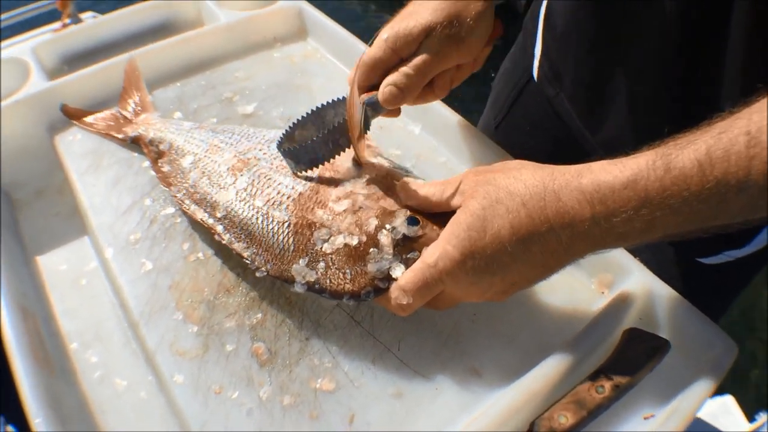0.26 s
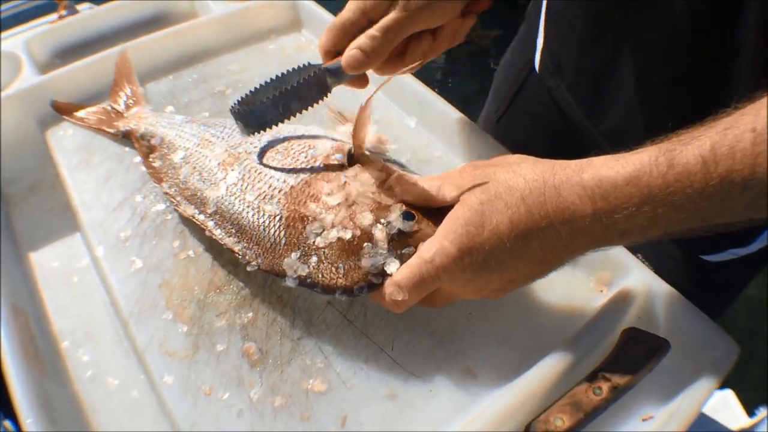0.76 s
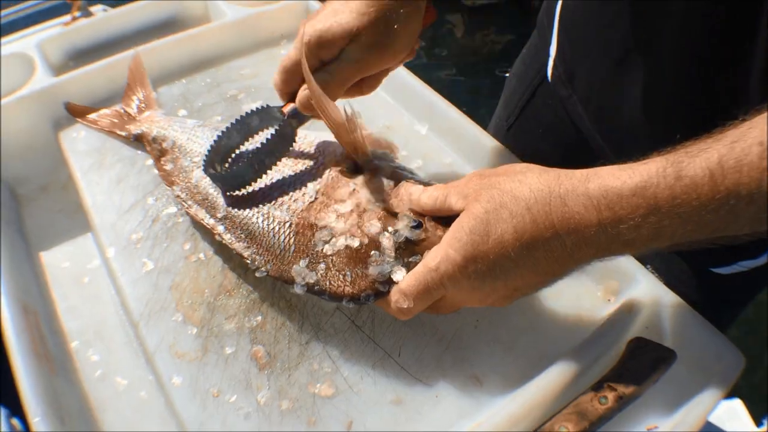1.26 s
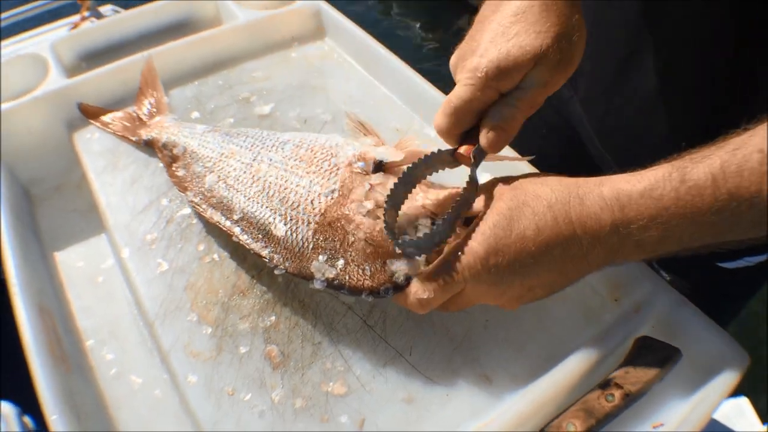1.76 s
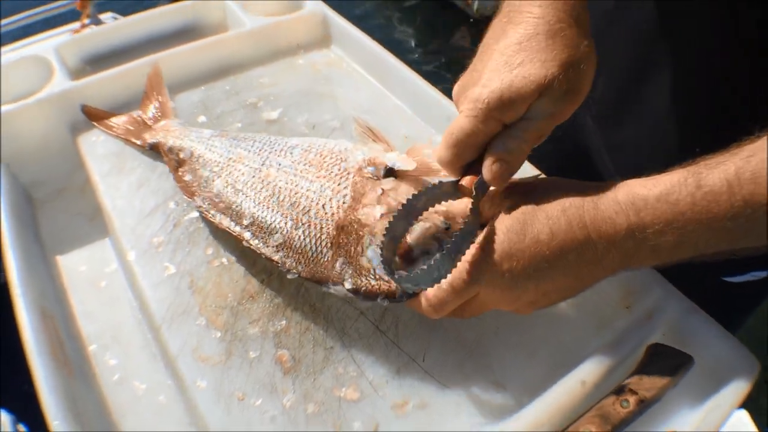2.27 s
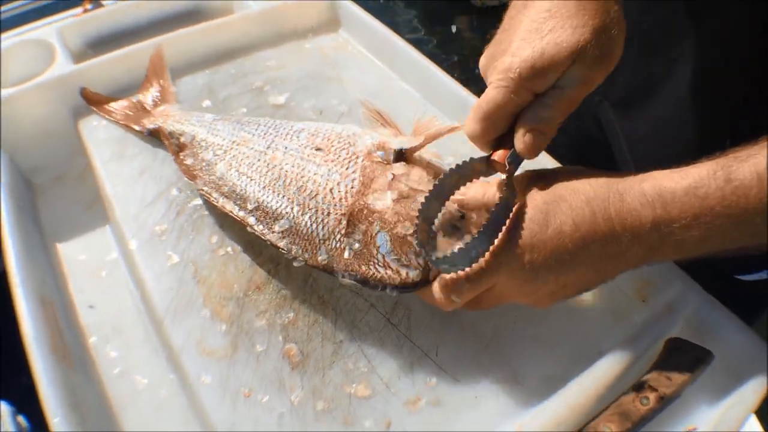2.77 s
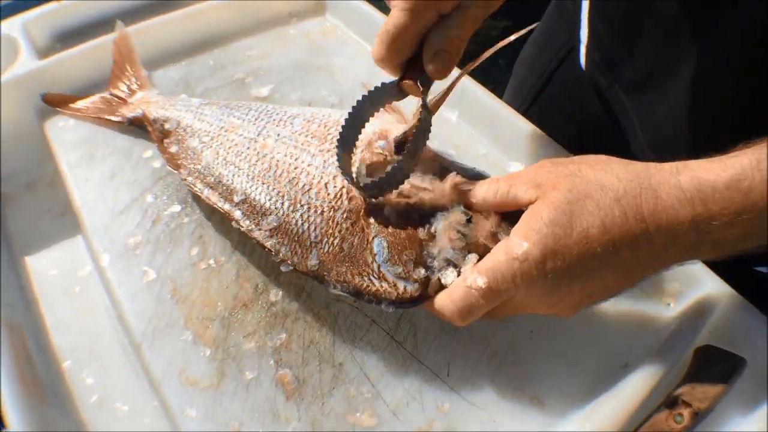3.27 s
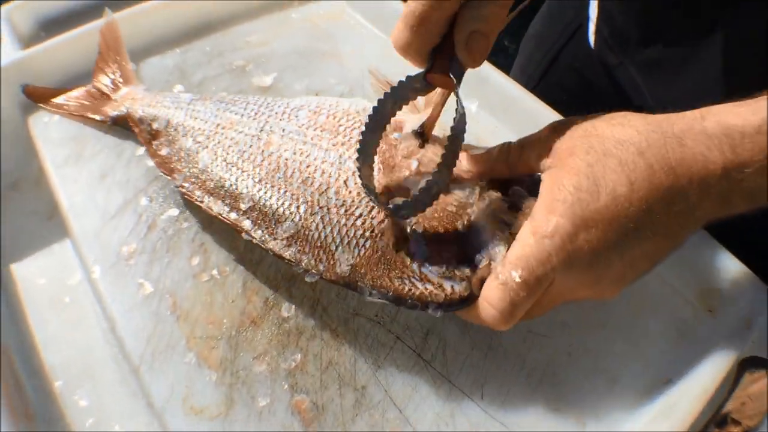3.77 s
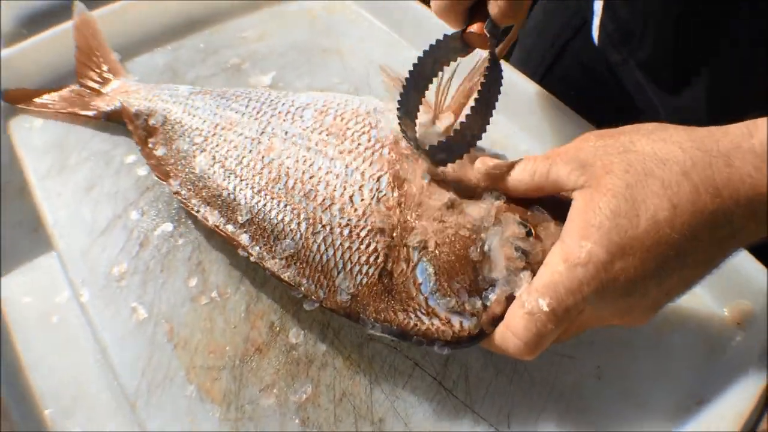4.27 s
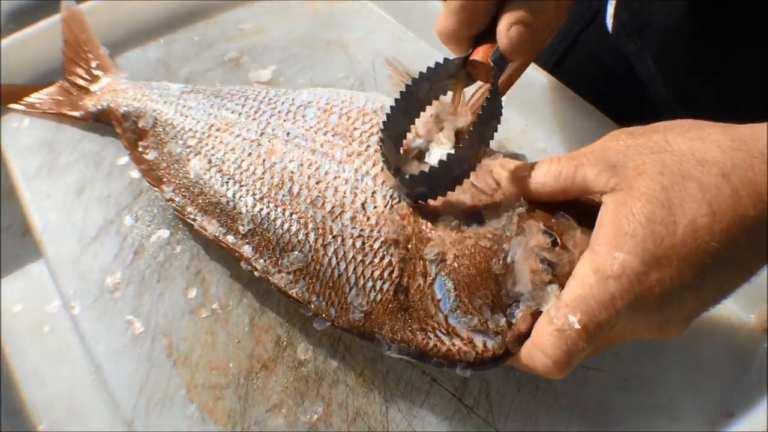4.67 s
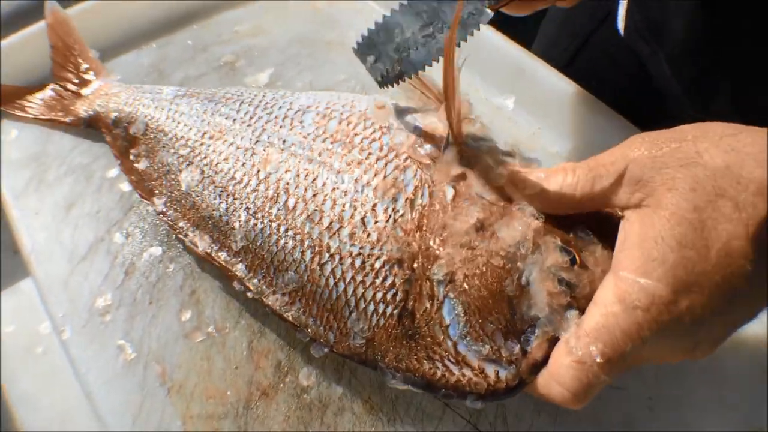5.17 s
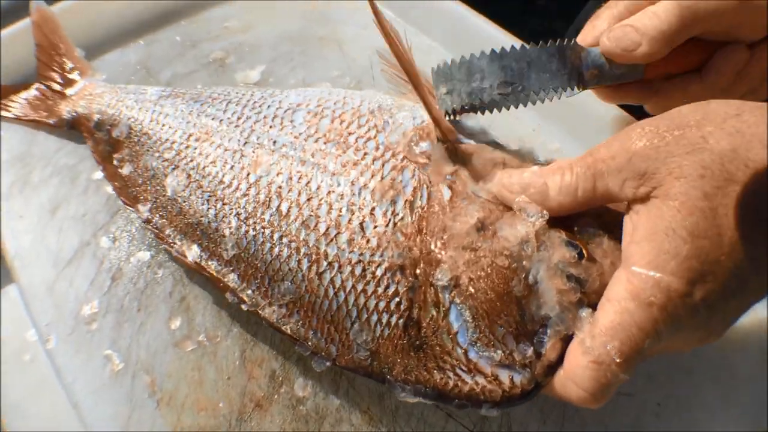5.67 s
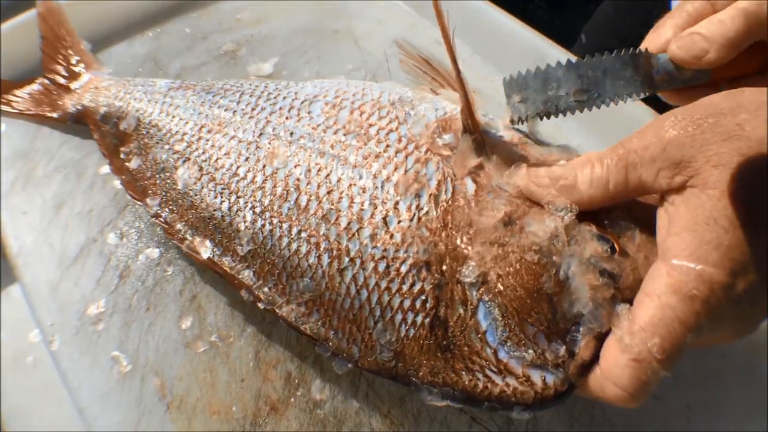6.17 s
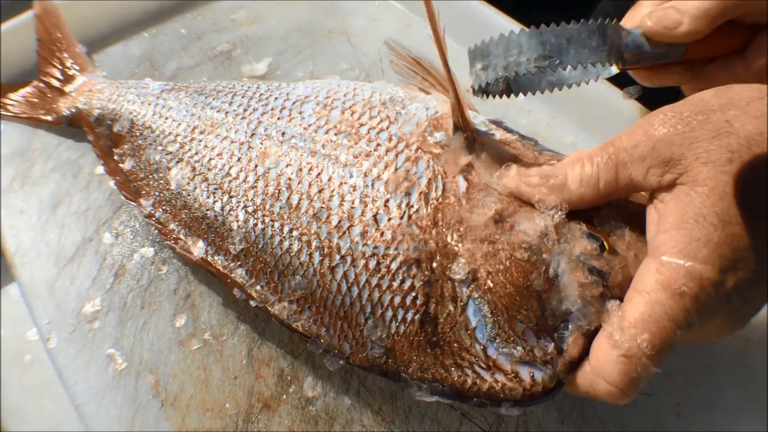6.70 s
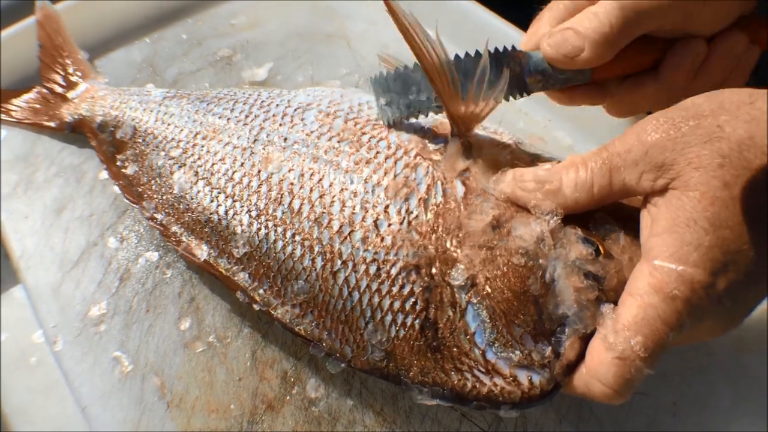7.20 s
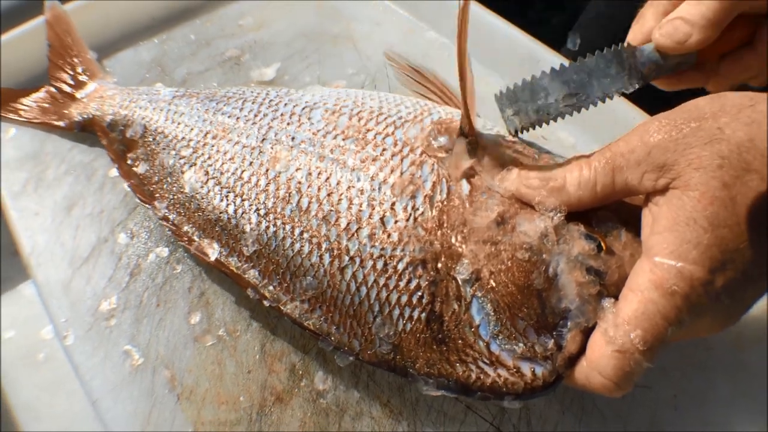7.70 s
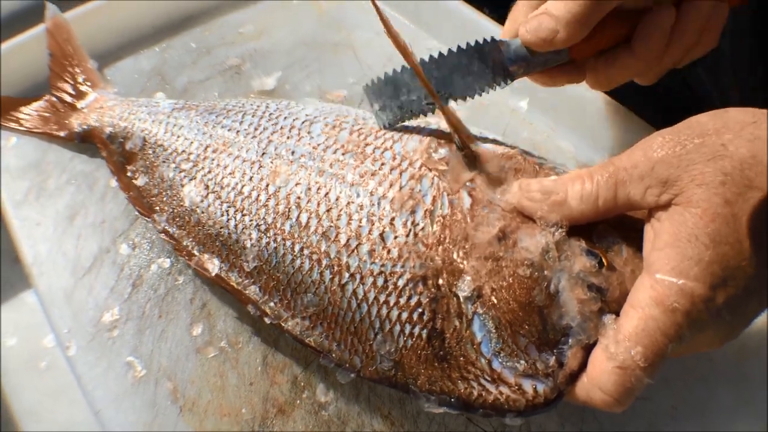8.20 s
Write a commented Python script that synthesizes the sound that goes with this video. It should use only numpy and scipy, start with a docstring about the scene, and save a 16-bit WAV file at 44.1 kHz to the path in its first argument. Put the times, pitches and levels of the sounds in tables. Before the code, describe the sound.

Outdoors and very close, a metal scaler works over a fish on a plastic tray, with little echo, above a low lumpy rumble and soft steady hiss. Faint scuffs and sharp snaps open the scene, with a firmer rasp at 0.35 seconds and a hollow tray knock at 0.6. Spaced, gritty strokes follow at 1.0 and 1.4, the steel ringing thinly. From 1.75 to 2.75 they come regularly, about four a second, strongest and hollow and bony near 2.25. Between 3 and 5 they lighten, with small scuffs and brittle ticks between. A hard crack lands at 5.5, then firm crunchy scrapes run from 5.8 to the end near 8.4, with heavier tray knocks around 7.3, 7.65 and 8. Wet skin ticks faintly, tiny squeaks pass, and soft low thuds mark the fish shifting, clearest near 6.6.

```python
"""Firm rasping strokes, about three a second with lighter ones between, over a soft outdoor rumble and hiss.
A toothed metal loop scaler is worked over a fish on a plastic tray: swarms of tiny fractures, shaped by each stroke,
drive a bright rasp, a scrape and a duller crunch, and ring the modes of the steel loop, tray and hollow gill cover.
Stiff scales snap off as torn noise, the fish knocks and thuds as dying sines, and wet skin ticks and squeaks."""
import sys
import numpy as np
from scipy import signal
from scipy.fft import rfft, irfft, next_fast_len
from scipy.io import wavfile
from scipy.ndimage import uniform_filter1d

SR = 44100
rng = np.random.default_rng(int(sys.argv[2]) if len(sys.argv) > 2 else 0)


def to_wav(s):
    """Save 16-bit WAV."""
    ch = np.atleast_2d(s).T  # columns
    pcm = np.round(np.clip(ch, -1, 1) * 32767)  # PCM
    wavfile.write(sys.argv[1], SR, pcm.astype(np.int16))


N = 372468
TAPS = 4096  # length of the clicks and ringing responses, in samples

# Strokes of the scaler, firm or light.
# Each row: crest in seconds, length in seconds, force in dB, depth of the bite in dB.
SCALER_STROKES = [(-0, 0.073, -41, 1), (0.134, 0.046, -48, 4.5), (0.347, 0.05, -32.5, -0.5),
                  (.605, 0.095, -40.5, 0), (1.024, 0.097, -34, -0.5), (1.42, 0.083, -32.5, -0.5),
                  (1.764, 0.069, -31, -1.5), (2.004, 0.06, -29.5, -0.5), (2.253, .056, -27.5, 1),
                  (2.516, 0.058, -27.5, 0), (2.616, 0.048, -45.5, 2.5), (2.749, 0.077, -29, -.5),
                  (2.993, 0.073, -35, -.5), (3.072, 0.056, -44.5, 5), (3.292, 0.086, -34, -1),
                  (3.539, 0.051, -47, -1), (3.655, 0.058, -36, 0), (3.766, 0.058, -47.5, -1.5),
                  (3.965, 0.054, -34, -2), (4.057, 0.045, -45.5, 0), (4.227, .08, -33.5, -1),
                  (4.343, 0.04, -44, 0.5), (4.494, 0.083, -40, -1.8), (4.76, 0.072, -39.5, .5),
                  (4.874, 0.035, -42.5, 4.5), (5.015, 0.083, -38, 0.5), (5.379, 0.067, -48.5, -0.5),
                  (5.515, 0.11, -36, -1.4), (5.747, 0.026, -39, 2), (5.833, 0.062, -31.5, -1),
                  (6.101, 0.069, -28.5, -1.5), (6.358, 0.068, -30.5, 0), (6.614, .062, -32.5, 1),
                  (6.927, 0.092, -33.5, -.5), (7.125, 0.058, -52, -1.5), (7.271, 0.079, -30, 2),
                  (7.647, 0.061, -27, 2), (7.987, 0.075, -30, 1.5), (8.134, 0.055, -43.5, 0),
                  (8.272, 0.061, -35, 1.5), (8.344, 0.03, -35, 2)]
# The tray's floor. Each row: mode in Hz, width in Hz, gain at resonance in dB.
TRAY_FLOOR = [(293.5, 65, 2), (341, 112, -3.5), (91, 20, -6.5), (417, 310, -16.5), (702, 204, -13.5)]
# The fish's bulk on the tray. Each row: mode in Hz, width in Hz, gain at resonance in dB.
FISH_BULK = [(118, 49, 1.5), (166, 50, 3.5), (223, 73, -4.5)]
# How hard the fish is pressed into the tray. Each row: time in seconds, gain in dB.
FISH_WEIGHT = [(.3, -29), (1.1, 3), (2.5, -1.5), (4.9, -3), (6.3, 4), (7.2, 5.5), (8.3, -0.5)]
# How firmly the fish lies against the tray, so that tugs and snaps shake it.
# Each row: time in seconds, gain in dB.
TRAY_CONTACT = [(0, 3.5), (.62, 5), (1.03, -1.5), (2.5, -5.5), (3.0, -12), (3.3, 2), (4.2, -2.5),
                (4.75, 5.5), (5.5, 0.5), (5.85, -4), (6.9, -3), (7.3, 4.5), (7.7, 5.5), (8.0, 4), (8.3, 2)]
# Bright colour of breaking scales. Each row: frequency in Hz, relative level in dB.
BRIGHT_RASP = [(1500, -53.5), (3500, -0.5), (5000, -5), (7000, -1.5), (10000, -1.5), (14500, -2),
               (15400, -13), (16200, -67)]
# Duller colour of a cracking scale. Each row: frequency in Hz, relative level in dB.
DULL_CRACK = [(200, -61), (700, -5), (1400, 9.5), (2300, 5.5), (3400, 10), (5000, 3), (9000, -19),
              (16000, -58)]


def amp(db):
    """Decibels to gain."""
    return 10 ** (np.asarray(db) / 20)


def evened(x):
    """Scales to an rms of one."""
    return x / np.sqrt(np.mean(x ** 2) + 1e-20)


def read(points, hz):
    """Gain of a spectrum, its dB points joined by lines on a log-frequency axis."""
    f, db = np.transpose(points)
    return amp(np.interp(np.log(hz + 1), np.log(f + 1), db))


def follow(curve):
    """Gain along a curve whose rows hold seconds and dB."""
    return amp(np.interp(np.arange(N) / SR, *np.transpose(curve)))


def add(mix, s, sound):
    """Adds a sound to the mix at time s."""
    part = mix[max(round(s * SR), 0):][:len(sound)]
    part += sound[:len(part)]


def noise(gain_at):
    """Noise of unit rms whose spectrum is the function gain_at(Hz)."""
    size = next_fast_len(N)
    spectrum = rfft(rng.standard_normal(size))
    shaped = spectrum * gain_at(np.fft.rfftfreq(size, 1 / SR))
    return evened(irfft(shaped, size)[:N])


def wander(hz):
    """Smooth random drift of unit rms, changing up to about hz times a second."""
    return noise(lambda f: np.exp(-(f / hz) ** 2))


def click(points):
    """The shortest causal (minimum-phase) click with this spectrum, of unit energy."""
    log_gain = np.log(read(points, abs(np.fft.fftfreq(TAPS, 1 / SR))))
    minimum_phase = np.exp(np.conj(signal.hilbert(log_gain)))
    h = np.fft.ifft(minimum_phase).real
    return h / np.linalg.norm(h)


def ring(modes):
    """Dying sines that answer one blow, of unit energy; a wider mode dies faster."""
    t = np.arange(TAPS) / SR
    h = np.zeros(TAPS)
    for k, (hz, width, db) in enumerate(modes):
        decay = np.exp(-np.pi * width * t)
        h += (-1) ** k * amp(db) * width * decay * np.sin(2 * np.pi * hz * t)
    return h / np.linalg.norm(h)


def through(x, h):
    """Plays a train of impulses through a response."""
    return signal.oaconvolve(x, h)[:N]


def shifting(x, patch_db):
    """The colour drifts in random time-frequency patches as the teeth move on to other scales."""
    z = signal.stft(x, nperseg=256, noverlap=192)[2]
    across_pitch = uniform_filter1d(rng.standard_normal(z.shape), size=5, axis=0)
    patches = uniform_filter1d(across_pitch, size=12, axis=1)
    gain = evened(amp(patch_db * evened(patches)))
    return signal.istft(z * gain, nperseg=256, noverlap=192)[1][:N]


def grains(per_s, spread_db):
    """Sizes of tiny fractures at random moments: many small, a few large; unit rms."""
    size = amp(spread_db * np.minimum(rng.exponential(1, N), 4.5))
    return evened(size * (rng.random(N) < per_s / SR))


def signed(sizes):
    """Each fracture pushes or pulls at random."""
    return sizes * rng.choice([-1, 1], N)


def pressure(shape, lag, per_depth=0, graze_db=-22, lead=2.36, trail=2.14):
    """Strength of one part of the sound: the teeth graze, dig in through the stroke, and lift off.
    The graze is lead times as long as the swell and trail times the lift-off; each dB of bite adds per_depth dB."""
    swell_share = 0.54  # part of a stroke spent digging in; the rest is the lift-off
    t, power = np.arange(N) / SR - lag, np.zeros(N)
    for crest, length, force_db, depth_db in SCALER_STROKES:
        near = slice(max(int((crest - .25) * SR), 0), int((crest + .25) * SR))
        d = t[near] - crest
        away = abs(d / (length * np.where(d < 0, swell_share, 1 - swell_share)))
        bite = np.exp(-away ** shape)
        graze = amp(graze_db) ** 2 * np.exp(-(away / np.where(d < 0, lead, trail)) ** shape)
        power[near] += amp(force_db + per_depth * depth_db) ** 2 * (bite + graze)
    return np.sqrt(power)


def air(air_db=-49.5, rumble_db=6.5, hiss_db=0.0, waver_db=-1.0):
    """A lumpy outdoor rumble under a steady soft hiss: two bands of shaped noise."""
    # Outdoor background. Each row: frequency in Hz, relative level in dB.
    air_colour = [(15, -27), (25, 9.5), (80, 13), (161, -2.5), (301, -1.5), (503, -10), (887, -8.5),
                  (1100, -13.5), (1330, -11), (1890, -17.5), (2840, -17.5), (3520, -15), (5880, -26.5),
                  (14400, -36), (16000, -37)]
    # Slow rise and fall of the rumble. Each row: time in seconds, gain in dB.
    rumble_curve = [(0, -9), (.65, 0), (1.25, -5.5), (2.6, 2.5), (3.3, 0), (4.4, -2.5), (6.5, -1.5),
                    (8.4, -9)]
    split_hz = 140
    rumble = noise(lambda f: read(air_colour, f) * (f < split_hz))
    rumble = rumble * evened(amp(waver_db * wander(14.0)))
    hiss = noise(lambda f: read(air_colour, f) * (f >= split_hz))
    both = amp(rumble_db) * follow(rumble_curve) * rumble + amp(hiss_db) * hiss
    return amp(air_db) * both / np.sqrt(2)


def wet_skin(tick_db=-63, squelch_db=-62, shift_db=8.0, shift_hz=7):
    """Loose scales and slime tick faintly as the fingers shift, each tick a tiny cluster of parting films."""
    parting = np.exp(-np.arange(100) / 8)  # decay in samples
    sizes = evened(through(grains(per_s=160, spread_db=5), parting))
    sizes = sizes * evened(amp(shift_db * wander(shift_hz)))
    ticks = through(signed(sizes), click(BRIGHT_RASP))
    squelch = through(signed(sizes), click(DULL_CRACK))
    return amp(tick_db) * ticks + amp(squelch_db) * squelch


def squeaks(length_s=0.053, width_hz=130):
    """A pocket of slime resonates briefly as it is squeezed out: a noise puff through one mode."""
    # Slime squeezed under the fingers. Each row: middle in seconds, level in dB, pitch in Hz.
    slime_pockets = [(1.263, -48, 900), (2.66, -52, 500), (4.096, -48.5, 1370), (6.203, -52.5, 1030)]
    out, swell = np.zeros(N), signal.windows.hann(int(length_s * SR))
    for s, db, hz in slime_pockets:
        breath = swell * rng.standard_normal(len(swell))
        puff = signal.fftconvolve(breath, ring([(hz, width_hz, 0)]))
        add(out, s - length_s / 2, amp(db) * puff / puff[:len(swell)].std())
    return out


def thuds(rise_s=0.0065, thud_db=-1):
    """The soft, heavy fish rocks the tray for a few cycles of a low sine."""
    # The fish shifts and bumps the tray. Each row: start in seconds, relative level in dB, pitch in Hz.
    bumps = [(1.047, -24.5, 79.5), (1.718, -20.5, 68), (2.831, -28, 74), (3.409, -23, 81.4),
             (5.222, -31.5, 88.5), (5.513, -27, 102), (6.366, -22.5, 80), (6.604, -16.5, 94.4),
             (7.992, -33, 79)]
    t, out = np.arange(2 * TAPS) / SR, np.zeros(N)
    swell = (t / rise_s) ** 2 * np.exp(-t / rise_s)
    for s, db, hz in bumps:
        add(out, s, amp(db + thud_db) * swell / swell.max() * np.sin(2 * np.pi * hz * t))
    return out


def knocks(knock_db=0, bulk_db=-3):
    """Each jerk rings the floor of the tray once, and the bulk of the fish too when it is pressed down."""
    # A tooth hooks and jerks the fish against the tray. Each row: start in seconds, level in dB.
    jerks = [(0.003, -21), (0.391, -21), (0.618, -9.5), (1.426, -16), (2.248, -22), (2.526, -20.5),
             (4.672, -31.5), (4.787, -29), (5.0, -24.5), (5.448, -21), (6.63, -22), (7.246, -17),
             (7.27, -11.5), (7.648, -14), (7.994, -16.5), (8.011, -12), (8.28, -16.5)]
    out, hollow, bulk = np.zeros(N), ring(TRAY_FLOOR), ring(FISH_BULK)
    for s, db in jerks:
        pressed_db = np.interp(s, *np.transpose(FISH_WEIGHT))
        blow = hollow + amp(bulk_db + pressed_db) * bulk
        add(out, s, amp(db + knock_db) * blow / abs(hollow).max())
    return out


def landings():
    """Each stroke flings a loose scale, which ticks down soon after it: rows like those of the snaps."""
    flight_s, flight_spread_s = .045, .06
    level_db, level_spread_db, middle_db = -30.5, 3, -0.2
    rows = []
    for (crest, *_), (late, big) in zip(SCALER_STROKES, rng.random((len(SCALER_STROKES), 2))):
        lands_s = crest + flight_s + flight_spread_s * late
        rows.append((lands_s, level_db + level_spread_db * (2 * big - 1), middle_db))
    return rows


def snaps(tear_s=0.0012, per_size=0.15, strain_s=0.012, strain_db=-25, snap_db=0, knock_db=-11,
          per_contact=1.24, per_middle=0.29):
    """A stiff scale creaks under strain and tears off in a millisecond or two, the small ones fastest.
    The recoil knocks the tray, harder if the scale is thick and dull and the fish lies firmly."""
    # Stiff scales and spines that snap.
    # Each row: time in seconds, level in dB, share of the duller middle range in dB.
    stiff_scales = [(.107, -6, -2), (.123, -1.5, -2), (.332, -8.5, 0), (.391, -4.5, -1), (.619, -3, -1.5),
                    (.968, -13, -7), (1.019, -6, -6.5), (1.084, -13, -5), (1.427, -0.5, -7.5),
                    (1.494, -13, -7), (1.549, -22, -3), (1.708, -13.5, -0.5), (1.745, -5, 14),
                    (1.994, 0.5, -1), (2.047, -6, -31), (2.23, -5.5, -2.5), (2.468, -6.5, -4.5),
                    (2.495, -3, -9), (2.73, -6, -1), (2.794, -7, -11), (2.969, -5.5, -25),
                    (2.988, -2.5, -1.5), (3.085, -11.5, -10), (3.652, -11, -20), (3.737, -8, -13.5),
                    (4.043, -16, -5), (4.06, -13, -6), (4.262, -5.5, -9), (4.473, -13.5, -4.5),
                    (4.749, -9, -3.5), (5.037, -8.5, -14), (5.052, -11, -3.5), (5.512, 1, -9.5),
                    (5.617, -18.5, -4.5), (5.82, 0, -11), (5.849, -5, -4.5), (6.056, -19, -1),
                    (6.38, -2, -9.5), (6.622, -4, -6), (6.775, -16.5, -1.5), (6.97, -8.5, -2),
                    (7.023, -20, -1.5), (7.083, -17, -0.5), (7.273, -11, 10), (7.353, -25.5, 12),
                    (8.039, -7.5, -15), (8.088, -19, 2)]
    early = 700  # samples of strain ahead of the snap
    t, out = (np.arange(TAPS) - early) / SR, np.zeros(N)
    bright, dull = click(BRIGHT_RASP), click(DULL_CRACK)
    knock = np.pad(ring(TRAY_FLOOR), (early, 0))[:TAPS]
    rows = [*stiff_scales, *landings()]
    for (s, db, middle_db), fibres in zip(rows, rng.standard_normal((len(rows), 2, TAPS))):
        d = abs(t - tear_s)
        strain = amp(strain_db) * np.exp(-d / np.where(t < 0, strain_s / 2, strain_s))
        tearing = np.exp(-d / (tear_s * amp(per_size * db))) + strain
        dull_share = np.clip(amp(middle_db) ** 2, 0, .97)
        bright_crack = np.sqrt(1 - dull_share) * signal.fftconvolve(fibres[0] * tearing, bright)
        dull_crack = np.sqrt(dull_share) * signal.fftconvolve(fibres[1] * tearing, dull)
        crack = (bright_crack + dull_crack)[:TAPS]
        crack *= amp(db + snap_db) / abs(crack).max()
        contact_db = np.interp(s, *np.transpose(TRAY_CONTACT))
        recoil = amp(knock_db + per_contact * contact_db + per_middle * middle_db)
        add(out, s - early / SR, crack + recoil * np.linalg.norm(crack) * knock)
    return out


def fracturing(catch_db=3.5, catch_hz=150, slide=0.5, firmest=1.12):
    """Teeth catch row after row of scales, each catch a clump of tiny fractures over a smoother slide."""
    catches = evened(amp(catch_db * np.minimum(wander(catch_hz), firmest)))
    return catches * evened(np.hypot(grains(per_s=2800, spread_db=5.0), slide))


def tray(fractures, floor_db=-2.5, bulk_db=-7.0):
    """Each tug shakes the tray; pressing harder sets the whole fish rumbling."""
    tugs = signed(fractures) * pressure(shape=2.98, lag=0.00033, per_depth=0.19) * follow(TRAY_CONTACT)
    floor = through(tugs, ring(TRAY_FLOOR))
    bulk = through(tugs * follow(FISH_WEIGHT), ring(FISH_BULK))
    return amp(floor_db) * floor + amp(bulk_db) * bulk


def gill_cover(fractures, gill_db=-2):
    """Over the head the teeth push onto a bony plate, which rasps hollowly a little late in each stroke."""
    # The hollow gill cover. Each row: mode in Hz, width in Hz, gain at resonance in dB.
    bony_plate = [(920, 180, -5.5), (1280, 100, 1.5), (1800, 360, -9.5)]
    # How fully the teeth ride on the gill cover as they work over the head.
    # Each row: time in seconds, gain in dB.
    over_head = [(1.5, -32), (1.76, -25), (2.26, 2.5), (2.53, 1), (2.76, -3), (3.05, -19), (3.4, -22),
                 (3.8, -42)]
    drive = signed(fractures) * pressure(shape=7.2, lag=0.0055) * follow(over_head)
    return amp(gill_db) * through(drive, ring(bony_plate))


def loop(fractures, lowest_db=-2, upper_db=-6):
    """The steel loop rings from the first touch of its teeth; the grip decides which modes sing."""
    # Steel loop, its lowest mode first. Each row: mode in Hz, width in Hz, gain at resonance in dB.
    steel_modes = [(2313, 79, 0), (3520, 70, -4), (3716, 42, -6.5), (4720, 24, -5), (6320, 69, -8)]
    # How freely the loop sings in its lowest mode as the grip changes.
    # Each row: time in seconds, gain in dB.
    loose_grip = [(.6, -11), (1.0, -0.5), (2.3, -1), (3.3, -4.5), (4.3, -6.5), (5.5, -14.5), (8.0, -10)]
    drive = signed(fractures) * pressure(shape=1.9, lag=-0.0049, graze_db=-33)
    free = follow(loose_grip)
    lowest = free * through(drive, ring(steel_modes[:1]))
    upper = through(drive, ring(steel_modes[1:])) / (1 + free)
    return amp(lowest_db) * lowest + amp(upper_db) * upper


def scales(fractures, rasp_db=3.0, scrape_db=2.0, crunch_db=-0.5):
    """The scales' own sound: a bright rasp, the scrape of the teeth and, as they dig deeper, a duller crunch."""
    # Colour of the scraping teeth. Each row: frequency in Hz, relative level in dB.
    scrape_colour = [(1000, -48), (2000, -4.5), (2500, 0), (3400, 1.5), (4200, -3.5), (5500, -6.5),
                     (9000, -7)]
    # Colour of a deep bite. Each row: frequency in Hz, relative level in dB.
    crunch_colour = [(200, 4.5), (450, -2.5), (700, 1.5), (1000, 0.5), (1350, 3), (1900, -0.5),
                     (2800, -3.5), (6000, -15)]
    # A deeper bite rasps less and crunches more.
    rasp_drive = signed(fractures) * pressure(shape=3.0, lag=0., graze_db=-28.5, per_depth=-2.63)
    scrape_drive = signed(fractures) * pressure(shape=2.74, lag=0.)
    crunch_drive = signed(fractures) * pressure(shape=2.14, lag=0.0017, per_depth=1.17)
    rasp = through(rasp_drive, click(BRIGHT_RASP))
    scrape = through(scrape_drive, click(scrape_colour))
    crunch = through(crunch_drive, click(crunch_colour))
    return shifting(amp(rasp_db) * rasp + amp(scrape_db) * scrape + amp(crunch_db) * crunch, patch_db=3.5)


def bass_trimmed(x):
    """The deep bass below about 60 Hz is cut away from the tray's shaking."""
    return signal.sosfilt(signal.butter(4, 60, "highpass", fs=SR, output="sos"), x)


def surroundings(x, t60=0.036, echo_db=-17):
    """The tray's rim and nearby surfaces return a short scatter of dying noise."""
    t = np.arange(TAPS) / SR
    scatter = rng.standard_normal(TAPS) * amp(-60 * t / t60) * (t > .002)
    return x + amp(echo_db) * through(x, scatter / np.linalg.norm(scatter))


def scene():
    """All the work on the fish, close by, in the open air."""
    fractures = fracturing()  # one train of fractures drives every scraped part
    scraping = scales(fractures) + loop(fractures) + gill_cover(fractures)
    shaking = bass_trimmed(tray(fractures) + knocks())
    snapping = shifting(snaps(), patch_db=2.5)
    work = scraping + shaking + snapping + wet_skin() + squeaks()
    return (surroundings(work) + thuds() + air())[None]


def record(dry):
    """The sharpest peaks are rounded off towards a ceiling; then the treble is cut at the band limit."""
    ceiling, edge_hz = .52, 15900
    rounded = dry / (1 + (dry / ceiling) ** 4) ** (1 / 4)
    lowpass = signal.firwin(511, edge_hz, window=("kaiser", 9), fs=SR)
    return signal.oaconvolve(rounded, lowpass[None], "same")


dry = scene()
out = record(dry)
to_wav(out)
```